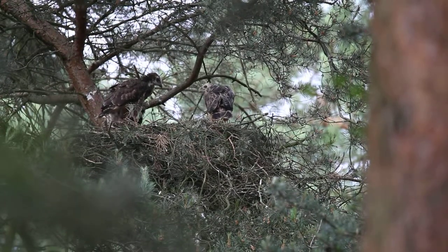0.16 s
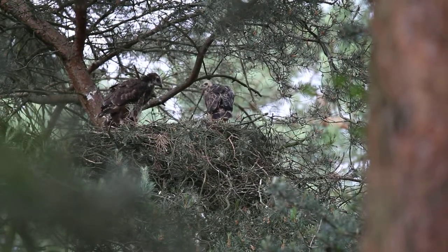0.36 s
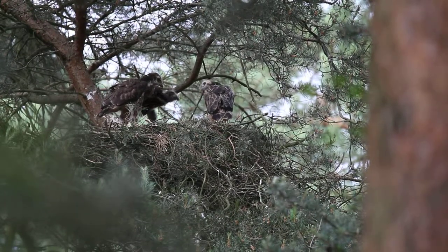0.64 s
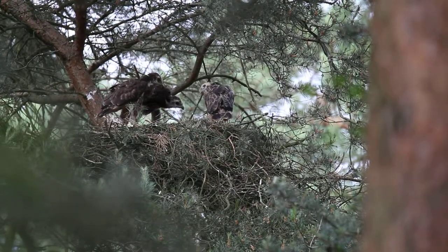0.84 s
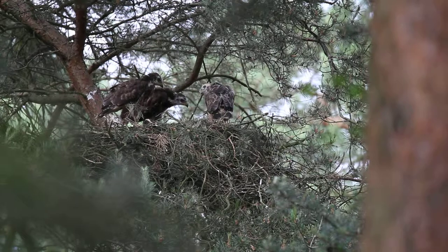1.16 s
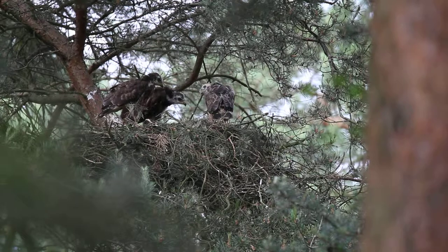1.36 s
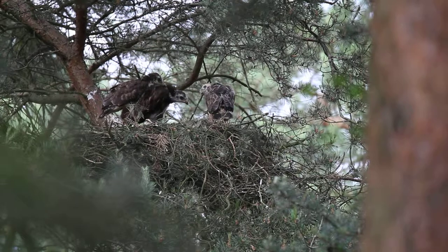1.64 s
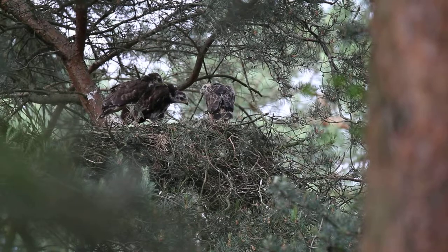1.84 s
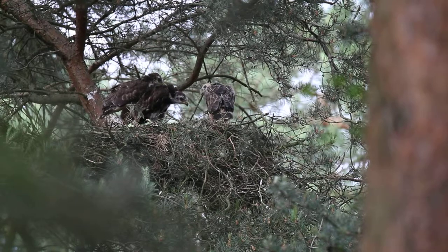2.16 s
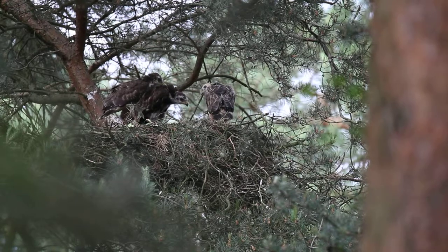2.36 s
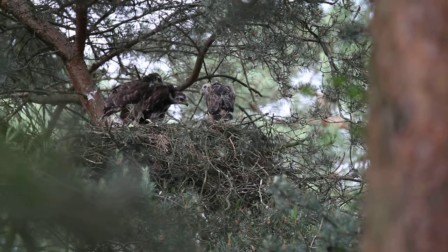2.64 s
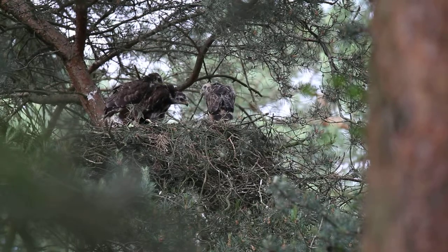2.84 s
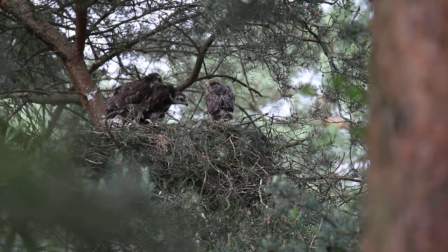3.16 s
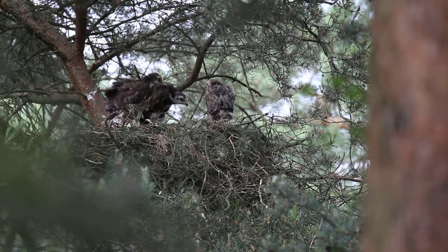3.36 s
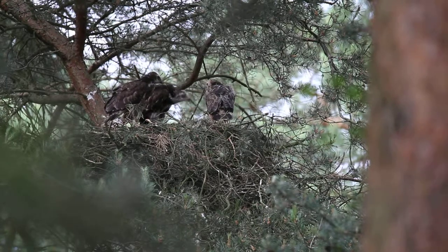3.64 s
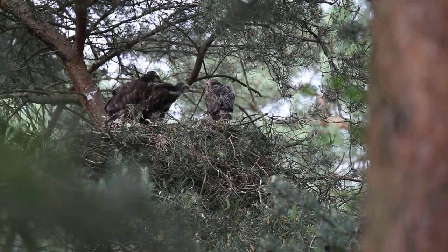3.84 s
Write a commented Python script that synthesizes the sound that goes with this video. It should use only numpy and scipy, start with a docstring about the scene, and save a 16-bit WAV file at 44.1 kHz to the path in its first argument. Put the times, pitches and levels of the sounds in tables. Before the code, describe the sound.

Rapid songbird notes echo through a pine wood, growing into a trill, then thin high notes and a descending buzz. Faint rumble and hiss lie underneath, with a few light twig ticks close by.

```python
"""A pine wood, heard from one spot. Faint far rumble, a low hum and a thin high hiss lie under everything.
Twigs begin to tick close to the microphone. Some way off, small songbirds whistle chips, thin slurs and
dipping notes that swell into a trill, a few rasps and a flourish; then come five high lisps and a falling
buzz. Trunks and crowns scatter every note into a long tail."""
import sys
import numpy as np
from scipy import signal
from scipy.fft import rfft
from scipy.io import wavfile
from scipy.ndimage import uniform_filter1d

SR = 44100
rng = np.random.default_rng(int(sys.argv[2]) if len(sys.argv) > 2 else 0)


def persist_wave(psi):
    """Save psi, clipped to +-1, as 16-bit WAV."""
    counts = np.round(np.clip(psi, -1, 1) * 32767).astype(np.int16)
    wavfile.write(sys.argv[1], SR, np.atleast_2d(counts).T)


N = 176400
T = np.arange(N) / SR


def from_db(db):
    """Decibels to gain."""
    return 10 ** (np.asarray(db) / 20)


def rms_one(x):
    """Scale to unit rms."""
    return x / np.sqrt(np.mean(x ** 2) + 1e-20)


def at_hz(points, hz):
    """Read a table on a log-frequency axis."""
    f, value = np.transpose(points)
    return np.interp(np.log(hz + 1e-3), np.log(f), value)


def along(rows, t):
    """Read each column of a curve at the times t."""
    s, *columns = np.transpose(rows)
    return [np.interp(t, s, c) for c in columns]


def peak(f, centre_hz, width_hz):
    """A rounded peak of gain 1."""
    return 1 / (1 + (2 * (f - centre_hz) / width_hz) ** 2)


def noise(gain_at):
    """Noise of unit rms, its spectrum shaped by gain_at(f)."""
    f = np.arange(N // 2 + 1) * SR / N
    return rms_one(np.fft.irfft(rfft(rng.standard_normal(N)) * gain_at(f), N))


def drift(hz):
    """Random wander of unit rms, mostly slower than hz."""
    return noise(lambda f: 1 / (1 + (f / hz) ** 2))


# Spectrum of the air: f/Hz, relative level/dB
AIR_SPECTRUM = [(25, -25), (48, -15), (78, -11), (100, -10), (170, -9), (205, -5.5), (280, -1.5), (350, -5),
                (500, 0.5), (700, -2.5), (1000, -5.5), (1500, -10), (1900, -12.5), (2800, -15),
                (4300, -17.5), (5100, -20.5), (5700, -19.5), (11400, -22), (15800, -28.5)]
# Swells of the hum: t/s, level/dB
HUM_LEVEL = [(0.0, -75), (0.02, -70), (1.05, -60.5), (1.26, -78), (1.38, -66), (1.6, -76), (1.84, -64.5),
             (1.93, -82), (2.02, -66.5), (3.2, -63), (3.48, -76.5), (3.54, -65.5), (3.88, -61.5),
             (4.0, -76)]

def background():
    """The bed of the place: far rumble and air, a narrow high hiss, a wavering low hum."""
    air = from_db(-52) * noise(lambda f: from_db(at_hz(AIR_SPECTRUM, f)))
    hiss = from_db(-60) * noise(lambda f: peak(f, centre_hz=4920, width_hz=480))
    hum_db, = along(HUM_LEVEL, T)
    hum_hz = 117.9 * (1 + .018 * drift(11))
    hum = np.sqrt(2) * from_db(hum_db) * np.sin(2 * np.pi * np.cumsum(hum_hz) / SR)
    return air + hiss + hum


# Twig ticks: t/s, level/dB, ring time/s
TWIG_TICKS = [(.428, -57, .05), (1.083, -57, .02), (1.392, -39.5, 0.019), (1.442, -52, 0.065),
              (1.66, -54, 0.055), (1.914, -51, 0.015), (2.013, -49, .02), (2.163, -42.5, 0.03),
              (2.199, -60, 0.14), (2.24, -48, 0.08), (2.306, -39.5, 0.018), (2.697, -47, 0.021)]
# Their spectrum: f/Hz, relative level/dB
TWIG_SPECTRUM = [(700, -25), (1500, 13), (3000, -9), (7000, 4), (12000, 4.5), (16000, -24)]

def twigs():
    """Bright ticks close to the microphone; one snap rings its twig, and a soft scuff follows."""
    envelope = sum(from_db(db - 60 * np.clip((T - s) / ring_s, 0, 3)) * np.clip((T - s) / .0028, 0, 1)
                   for s, db, ring_s in TWIG_TICKS)
    snap_s, knock_hz, knock_t60_s = 1.392, 2570, .0052
    age = np.maximum(T - snap_s, 0)
    knock = from_db(-31 - 60 * np.minimum(age / knock_t60_s, 3)) * np.sin(2 * np.pi * knock_hz * age)
    scuff = from_db(-53) * np.exp(-((T - 1.448) / .0087) ** 2)
    scuff *= noise(lambda f: peak(f, centre_hz=1840, width_hz=1300))
    return envelope * noise(lambda f: from_db(at_hz(TWIG_SPECTRUM, f))) + knock + scuff


# Decay among the trees: f/Hz, time to fall 60 dB/s
TAIL_T60 = [(1500, 2), (3000, 1.2), (4700, 1), (6500, 0.77), (10000, 0.45)]

def wood(x):
    """Echoes off near trunks, then a diffuse tail that dies sooner in the treble."""
    echoes_per_s, near_t60_s, build_s = 800, .35, .022
    near = rng.standard_normal(N) * (rng.random(N) < echoes_per_s / SR) * from_db(-60 * T / near_t60_s)
    edges, tail = np.geomspace(1000, 16000, num=9), 0
    for low, high in zip(edges, edges[1:]):
        decay = from_db(-60 * T / at_hz(TAIL_T60, np.sqrt(low * high)))
        band = noise(lambda f: (f >= low) & (f < high)) * decay * (1 - np.exp(-T / build_s))
        tail += rms_one(band) * np.sqrt(2 * (high - low) / SR)
    echoes = (from_db(1.5) * rms_one(near) + from_db(2) * tail) / np.sqrt(N)
    return signal.fftconvolve(x, echoes)[:N]


def syrinx(hz, gain):
    """A bird's whistle: a near sine with faint overtones that grow with effort."""
    phase = 2 * np.pi * np.cumsum(hz) / SR
    effort = np.minimum(gain / from_db(-32), 1)
    tone = np.sin(phase)
    for k, db in (2, -17), (3, -23):
        tone += from_db(db) * effort * np.sin(k * phase) * peak(k * hz, centre_hz=12100, width_hz=3300)
    return np.sqrt(2) * gain * tone


def sing(shape, notes, waver, warble_hz=0, swing=0):
    """Sing a shape, shifted to each note's time, level and pitch; waver roughens it."""
    out, unsteady = np.zeros(N), 1 + waver * drift(188)
    if swing:
        warble_rate = warble_hz * (1 + .15 * drift(60))
        unsteady *= 1 + swing * np.sin(2 * np.pi * np.cumsum(warble_rate) / SR)
    for s, db, factor in notes:
        span = (T > s + shape[0][0]) & (T < s + shape[-1][0])
        hz, shape_db = along(shape, T[span] - s)
        hz = uniform_filter1d(hz, size=130) * factor * unsteady[span]
        out[span] += syrinx(hz, from_db(db + shape_db) * signal.windows.tukey(len(hz), .1))
    return out


# One chip: t/s, f/Hz, level/dB
CHIP_SHAPE = [(-.004, 5706, -13), (.001, 5163, -3.5), (.008, 4683, 2), (.015, 4250, 1.5), (.02, 3760, -26)]
# As sung: t/s, level/dB, pitch factor
CHIP_NOTES = [(.772, -53, 1.07), (.803, -54, 1.13), (0.824, -51.5, 1.06), (.905, -60, 1.05),
              (0.981, -55, 1.2), (1.01, -48, 1.1), (1.024, -50.5, 1), (1.089, -45.5, 1.12),
              (1.626, -55, 1.23), (1.645, -40, .9), (1.909, -37.5, .9), (2.039, -43.5, 0.98),
              (2.186, -40, 0.96), (2.347, -55, 1.37), (2.369, -42, 1.03), (2.425, -55, 1.28),
              (2.447, -42, 0.98), (2.672, -43.5, 1), (2.694, -41, 0.84)]

def chips():
    """Tiny downward flicks."""
    return sing(CHIP_SHAPE, CHIP_NOTES, waver=.0278)


# One slur: t/s, f/Hz, level/dB
SLUR_SHAPE = [(-.004, 7910, -1.5), (.002, 7100, -4.5), (.018, 5700, 2), (.032, 4700, 5), (.046, 3660, -2.5),
              (.056, 2900, -2)]
# As sung: t/s, level/dB, pitch factor
SLUR_NOTES = [(.875, -60, 1), (1.061, -51.5, 0.9), (1.222, -44.5, 0.95), (1.391, -42.5, 0.94),
              (1.549, -41, 0.92), (1.70, -41, 0.96)]

def slurs():
    """Thin, steep downward slides."""
    return sing(SLUR_SHAPE, SLUR_NOTES, waver=.0183)


# One dip: t/s, f/Hz, level/dB
DIP_SHAPE = [(-.022, 5314, -5), (-.013, 4722, 0), (-.005, 4058, -5.5), (.001, 3717, -16),
             (.007, 4100, -3.5), (.014, 4750, -6), (.019, 5175, 0)]
# As sung: t/s, level/dB, pitch factor
DIP_NOTES = [(.93, -53.5, 0.83), (1.124, -44.5, 0.91), (1.204, -42, 0.9), (1.273, -42.5, 0.92),
             (1.35, -41, 0.92), (1.425, -46, 0.83), (1.488, -39.5, 0.91), (1.568, -45, 0.82),
             (1.646, -39, 0.92), (1.70, -41.5, 0.69), (1.77, -39.5, 1), (1.815, -39, 0.75)]

def dips():
    """Notes that sink and come back up."""
    return sing(DIP_SHAPE, DIP_NOTES, waver=.016)


# One trill note: t/s, f/Hz, level/dB
TRILL_SHAPE = [(-.036, 3207, 0.5), (-.024, 3586, -11), (-.015, 4273, -6), (-.008, 3400, 0.5), (0, 3050, 4),
               (.006, 2656, -3), (.012, 2412, -14)]
# As sung: t/s, level/dB, pitch factor
TRILL_NOTES = [(1.66, -46.5, 1.09), (1.782, -43, 1.02), (1.865, -35, 0.99), (1.937, -35.5, 0.95),
               (2.007, -34, 0.98), (2.078, -33, 0.95), (2.148, -32.5, 0.99), (2.219, -34.5, .95),
               (2.288, -32.5, 1.01), (2.357, -34, 1), (2.427, -33.5, 0.98), (2.494, -36.5, 0.91)]

def trill():
    """A quick run of arched notes."""
    return sing(TRILL_SHAPE, TRILL_NOTES, waver=.02)


# One rasp: t/s, f/Hz, level/dB
RASP_SHAPE = [(0, 3662, -9), (.009, 3104, 2.5), (.022, 2573, 2), (.032, 2250, -8)]
# As sung: t/s, level/dB, pitch factor
RASP_NOTES = [(2.081, -47, 1.1), (2.224, -51.5, 1), (2.588, -39, 0.95), (3.287, -43, 1.055),
              (3.784, -50.5, 1.43), (3.805, -47, 1.1)]

def rasps():
    """Falling notes made harsh by a fast warble."""
    return sing(RASP_SHAPE, RASP_NOTES, waver=.0442, warble_hz=190.4, swing=.23)


# Shapes of the flourish: t/s, f/Hz, level/dB
DROP_SHAPE = [(-.003, 4437, -21), (.004, 3480, 4), (.015, 2782, 3), (.03, 2385, -9), (.045, 2580, -11),
              (.058, 2200, -6.5), (.072, 1850, -28)]
RISE_SHAPE = [(0, 2195, -10.5), (.025, 2650, -5), (.048, 3050, 1.5), (.066, 3400, 0.5), (.078, 3960, -0.5),
              (.089, 4750, -0.5), (.097, 4830, -18), (.101, 4980, -17)]
FALL_SHAPE = [(0, 4422, -15), (.01, 3390, -4), (.022, 2975, -13), (.034, 2474, -4.5), (.05, 2048, -7),
              (.064, 1656, -21)]
# As sung: t/s, level/dB, pitch factor
DROP_NOTE = [(2.552, -34.5, 1)]
RISE_NOTE = [(2.688, -29.5, 1)]
FALL_NOTE = [(2.777, -32.5, 1)]

def flourish():
    """Three loud glides: down, up, down."""
    return (sing(DROP_SHAPE, DROP_NOTE, waver=.033),
            sing(RISE_SHAPE, RISE_NOTE, waver=.014),
            sing(FALL_SHAPE, FALL_NOTE, waver=.0394))


# The two voices of a lisp: t/s, f/Hz, level/dB
LISP_LOWER = [(0, 5590, -2.5), (.012, 6170, 4), (.028, 6900, -1.5), (.045, 6600, -16), (.064, 6350, -19)]
LISP_UPPER = [(.004, 6940, -10), (.013, 8400, -14), (.02, 9370, -9.5), (.032, 9030, -20), (.044, 7600, -12),
              (.052, 7200, -21)]
# As sung: t/s, level/dB, pitch factor
LISP_NOTES = [(2.922, -48.5, 1.11), (2.995, -46.5, 0.99), (3.062, -45, .98), (3.135, -44.5, .96),
              (3.21, -44.5, 0.99)]

def lisps():
    """Both voices of the syrinx: the lower warbles, the upper has the same pitch each time."""
    return (sing(LISP_LOWER, LISP_NOTES, waver=.052, warble_hz=138.1, swing=.121),
            sing(LISP_UPPER, [(s, db, 1) for s, db, _ in LISP_NOTES], waver=.045))


# Course of the buzz: t/s, centre f/Hz, sweep rate/Hz, level/dB
BUZZ_COURSE = [(3.364, 5150, 135, -45), (3.388, 5100, 139, -32.5), (3.42, 4850, 115, -35),
               (3.46, 4400, 108, -35), (3.51, 3650, 107, -34.5), (3.56, 3150, 95, -32.5),
               (3.61, 2700, 78, -36.5), (3.65, 2404, 55, -36), (3.70, 2040, 59, -46.5)]

def buzz():
    """A run of tiny down-sweeps, each swelling and fading, that slows as it sinks."""
    centre_hz, rate, db = along(BUZZ_COURSE, T)
    on = (T > BUZZ_COURSE[0][0]) & (T < BUZZ_COURSE[-1][0])
    cycle = np.cumsum(rate * on * (1 + .11 * drift(80))) / SR % 1
    pulse = np.abs(np.sin(np.pi * cycle)) ** 1.84
    sweep_hz = 2300 * np.minimum(1, centre_hz / 3600)
    hz = (centre_hz + sweep_hz * (.5 - cycle)) * (1 + .03 * drift(250))
    return syrinx(hz, from_db(db) * pulse * uniform_filter1d(on * 1., size=200))


def scene():
    """At the microphone: distant song, close twigs and the bed, alike in both channels."""
    drop, rise, fall = flourish()
    lower_lisps, upper_lisps = lisps()
    # voice, gain of its straight path through the needles/dB
    voices = [(chips(), -5), (slurs(), -9), (dips(), -4), (trill(), -3.5), (rasps(), -.5),
              (drop, -2), (rise, -5), (fall, 1), (lower_lisps, -11), (upper_lisps, -3.5), (buzz(), -2)]
    ticks = twigs()
    direct = sum(voice * from_db(db) for voice, db in voices)
    scattered = wood(sum(voice for voice, _ in voices) + from_db(-1) * ticks)
    mono = direct + from_db(-4) * scattered + from_db(2) * ticks + background()
    return np.array([mono, mono])


def record(dry):
    """The recorder cuts steeply above 15.8 kHz."""
    return signal.sosfiltfilt(signal.ellip(10, .1, 60, 15800, fs=SR, output="sos"), dry)


dry = scene()
out = record(dry)
persist_wave(out)
```